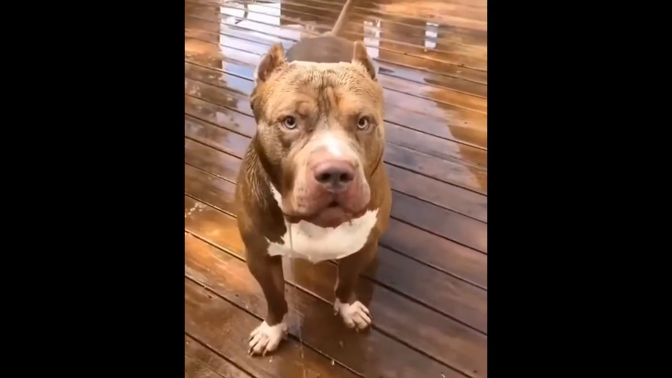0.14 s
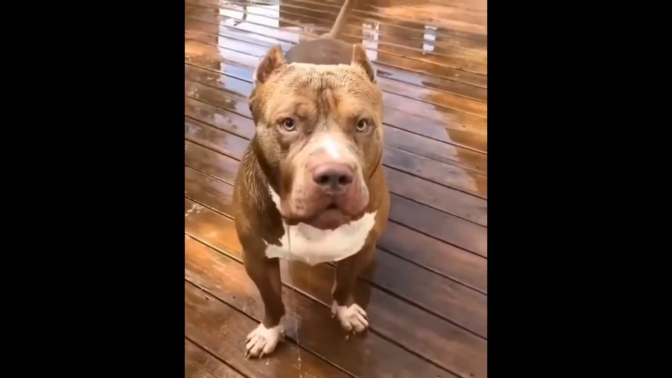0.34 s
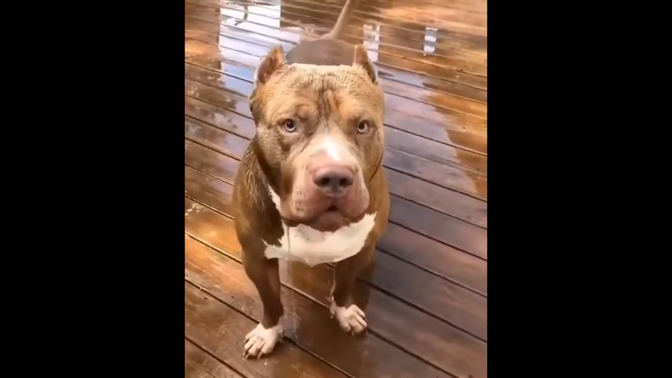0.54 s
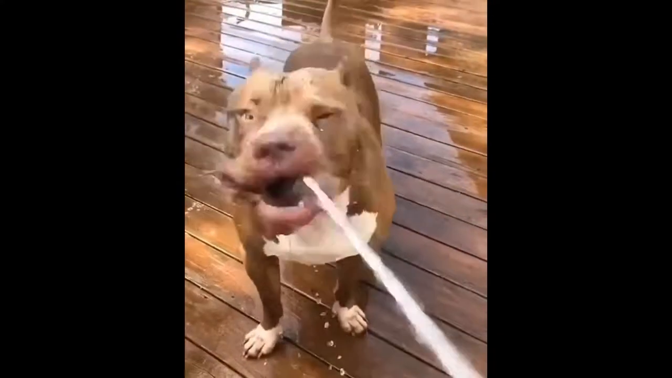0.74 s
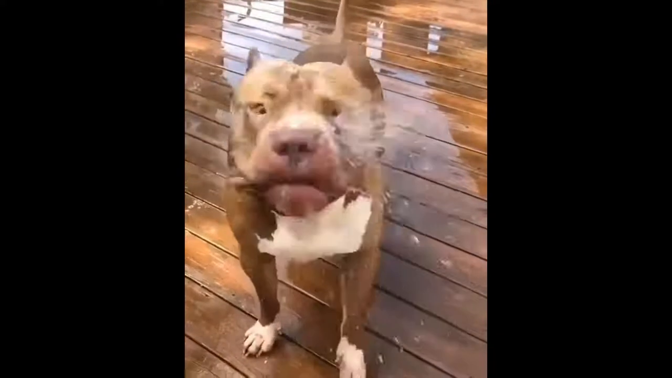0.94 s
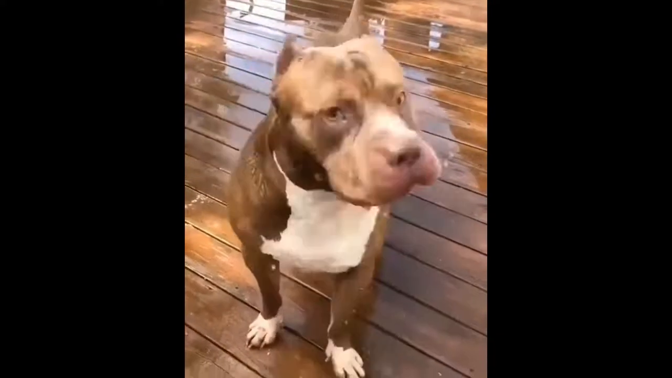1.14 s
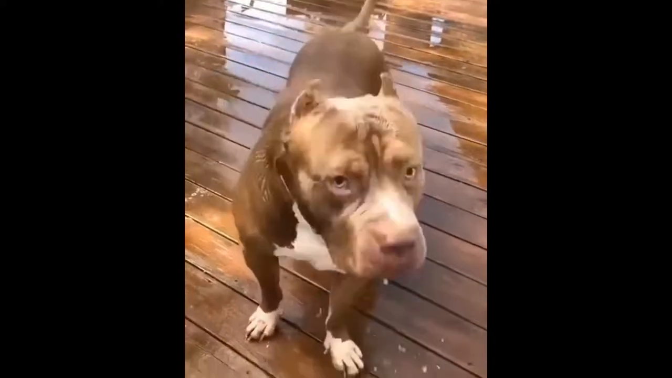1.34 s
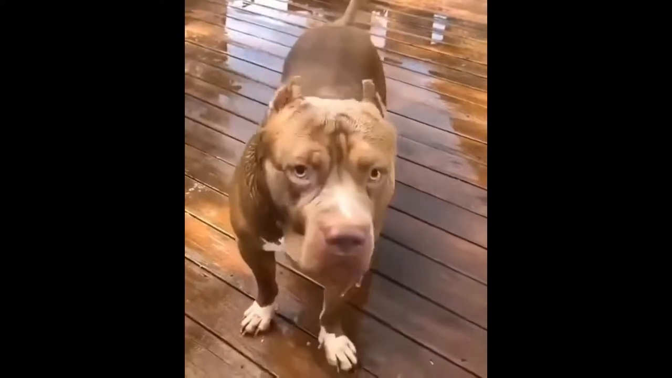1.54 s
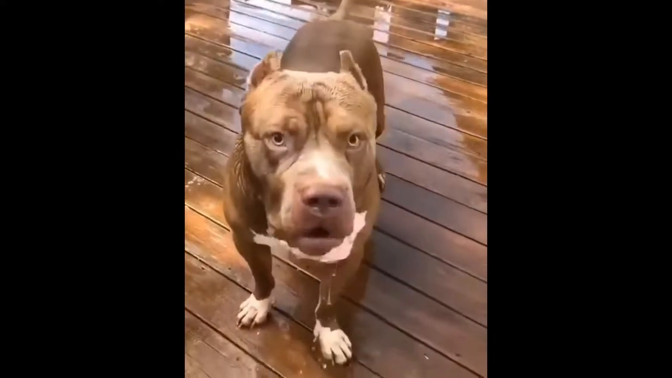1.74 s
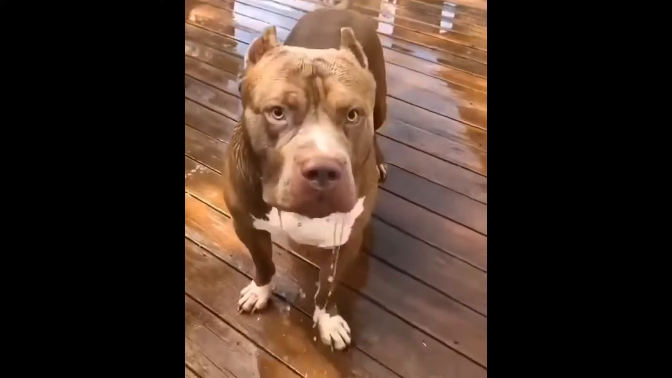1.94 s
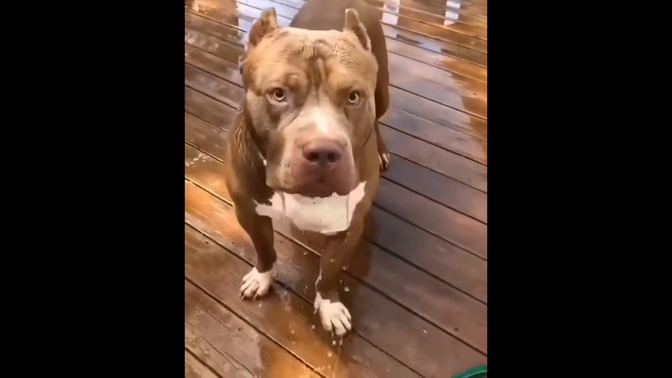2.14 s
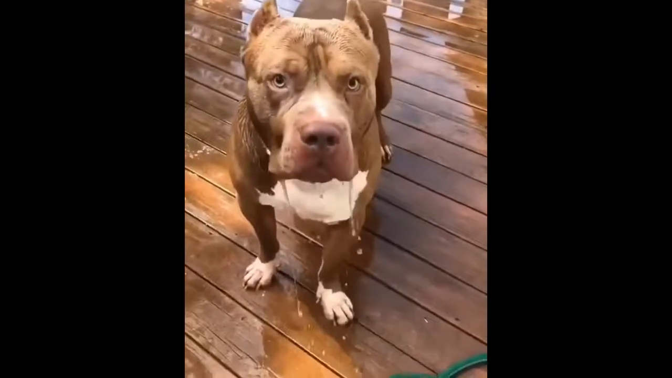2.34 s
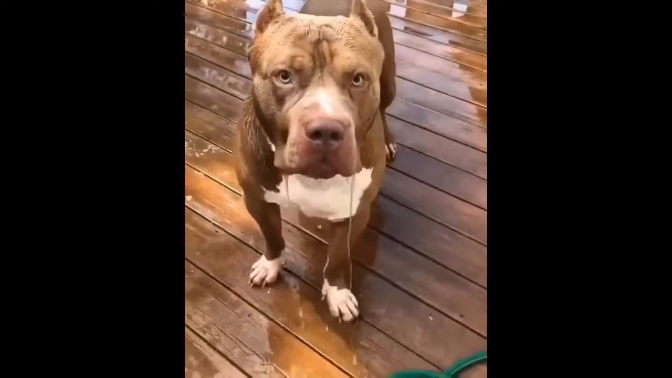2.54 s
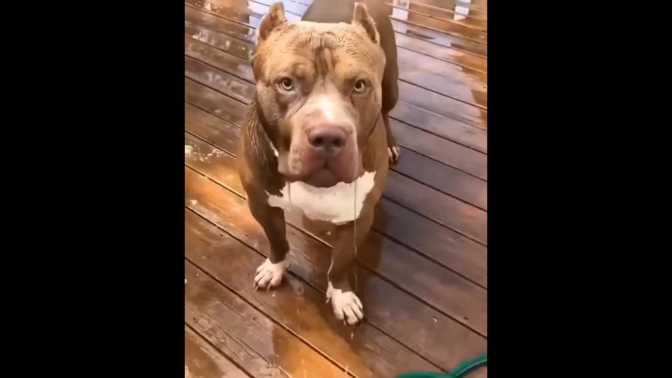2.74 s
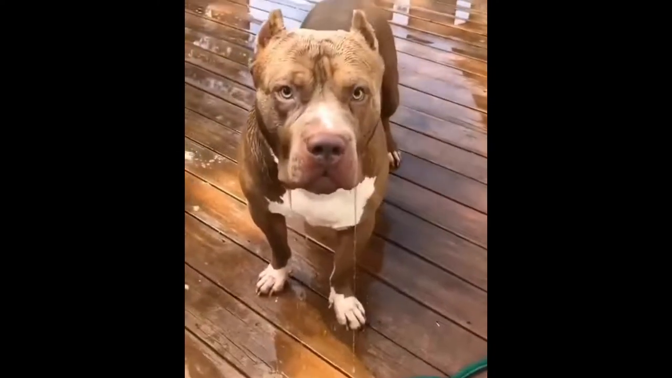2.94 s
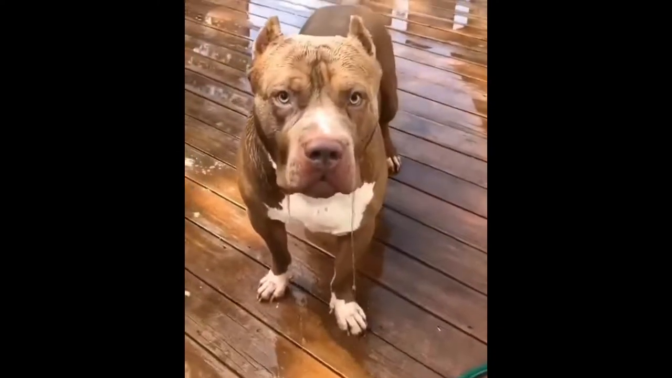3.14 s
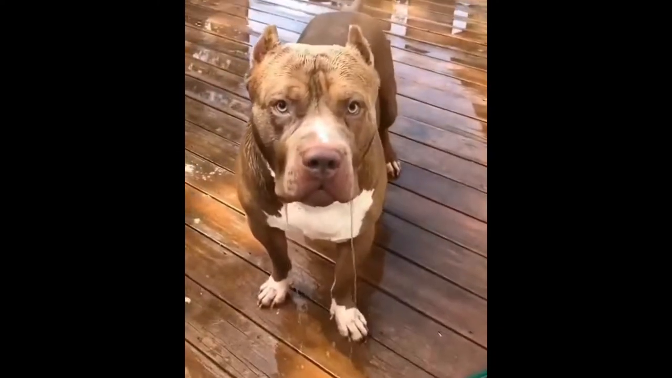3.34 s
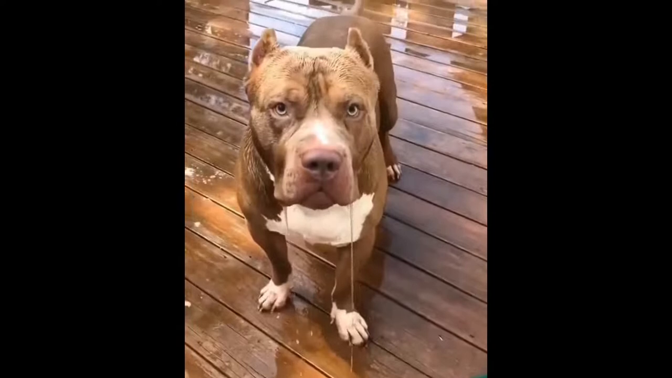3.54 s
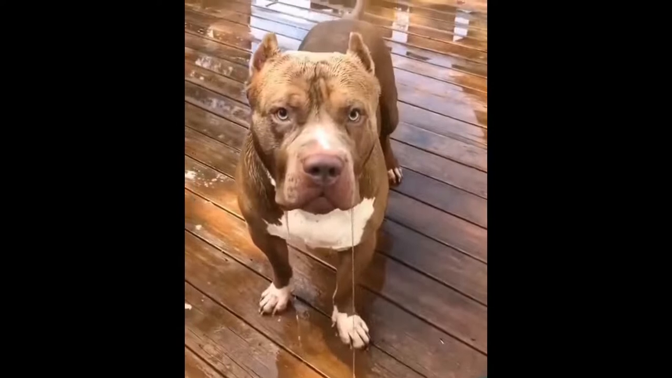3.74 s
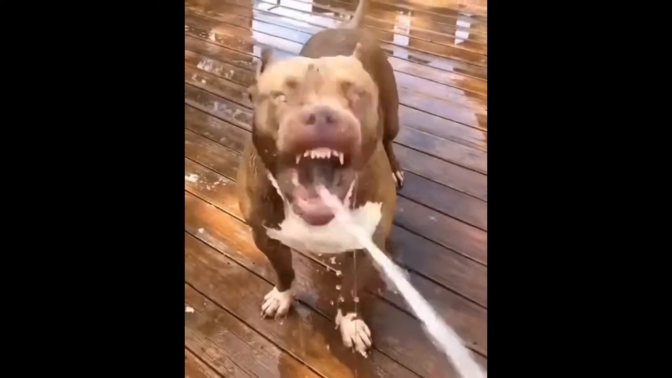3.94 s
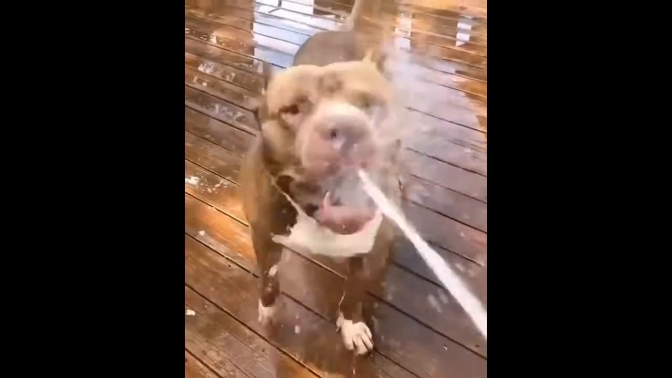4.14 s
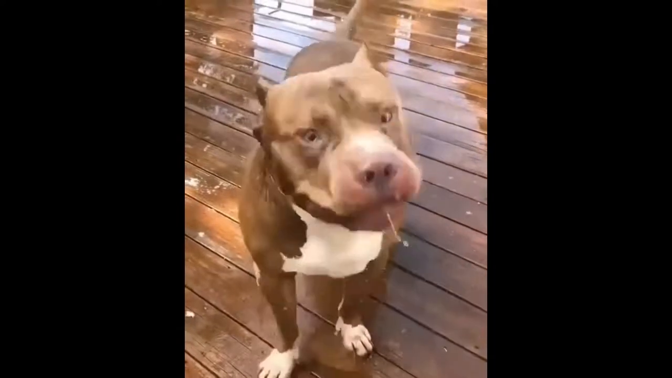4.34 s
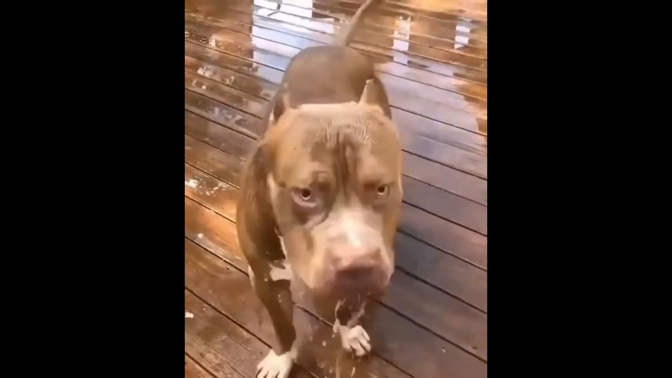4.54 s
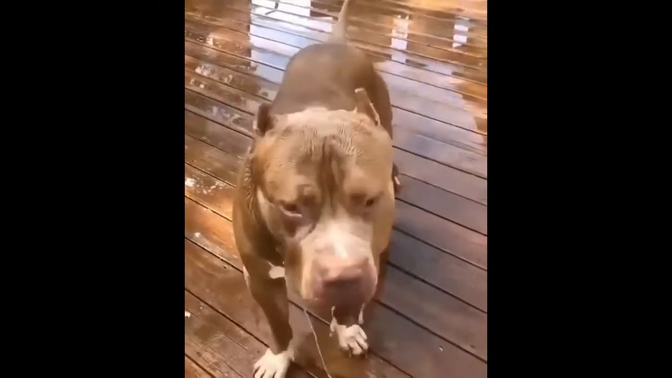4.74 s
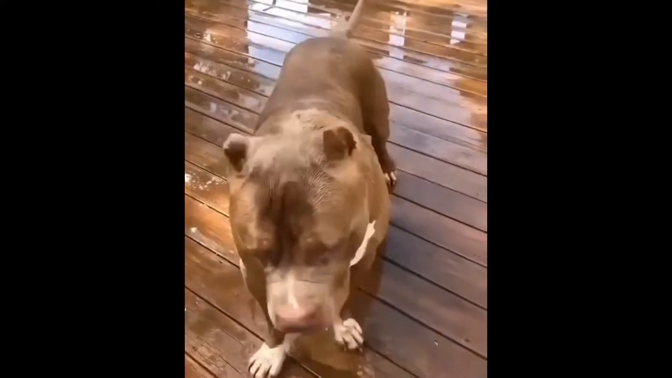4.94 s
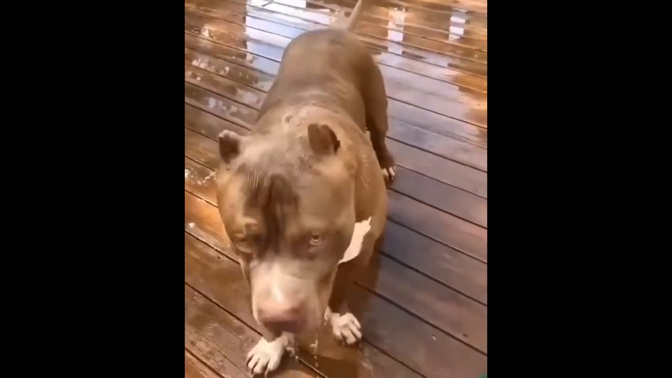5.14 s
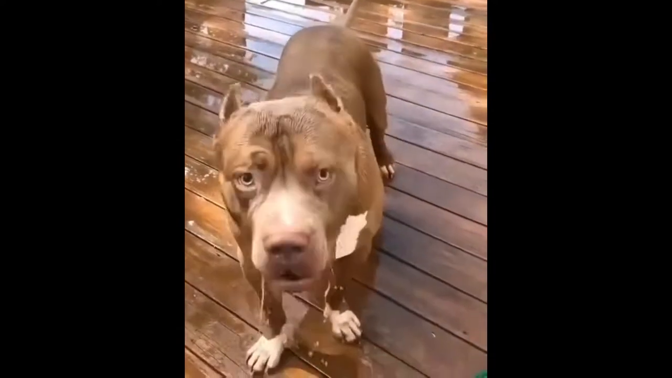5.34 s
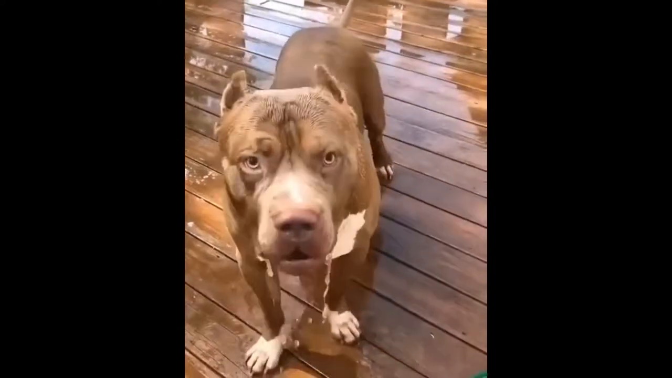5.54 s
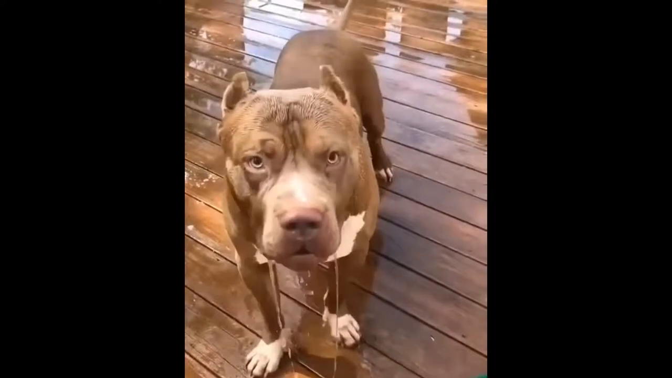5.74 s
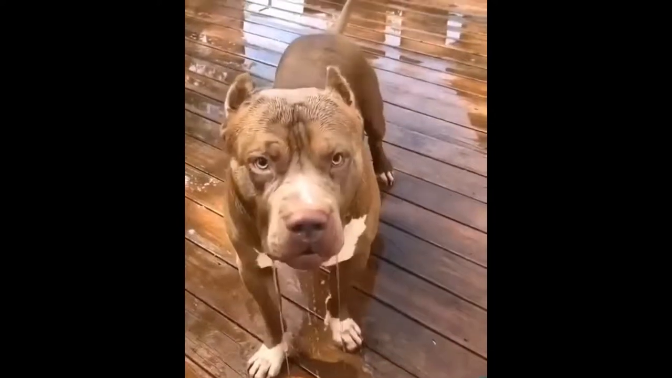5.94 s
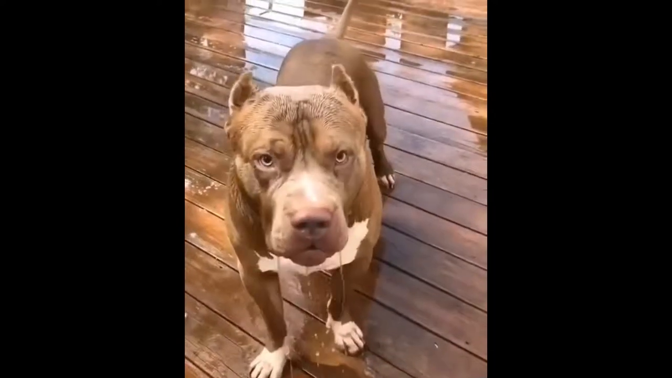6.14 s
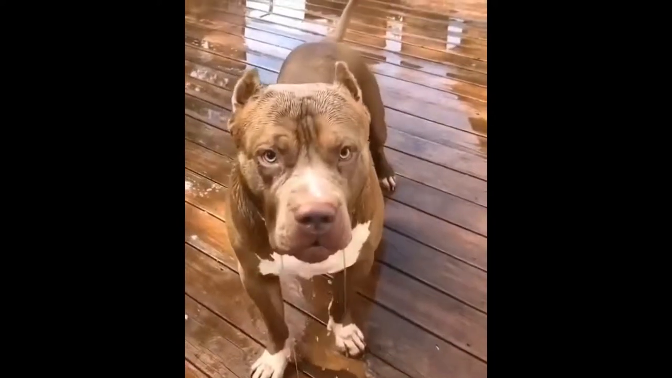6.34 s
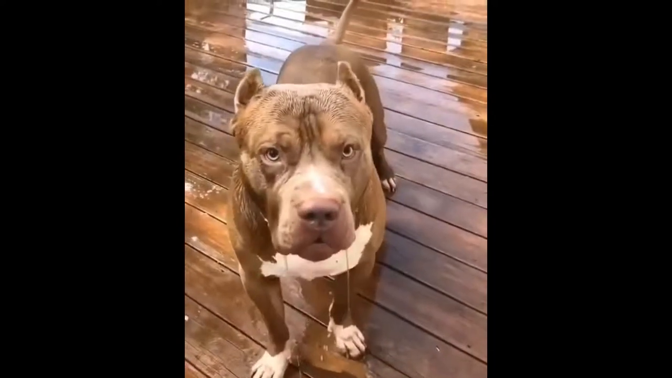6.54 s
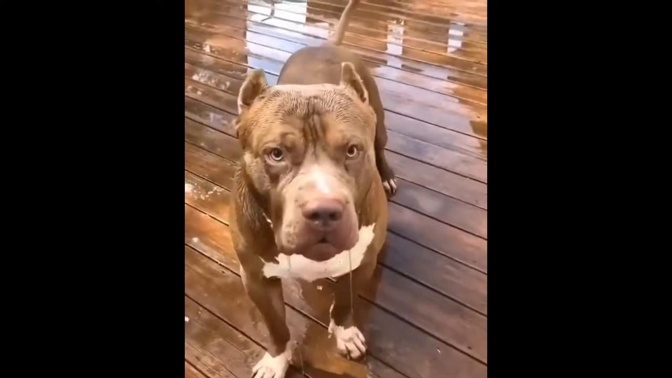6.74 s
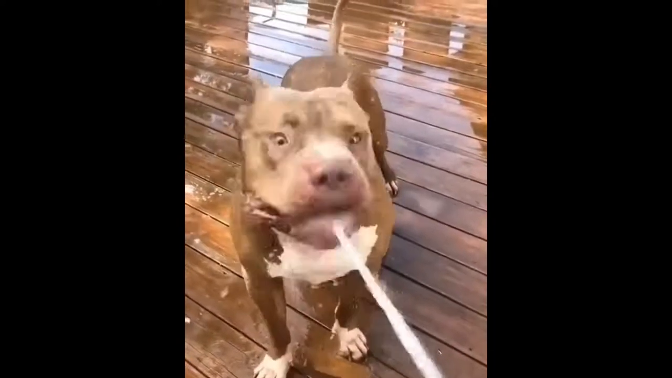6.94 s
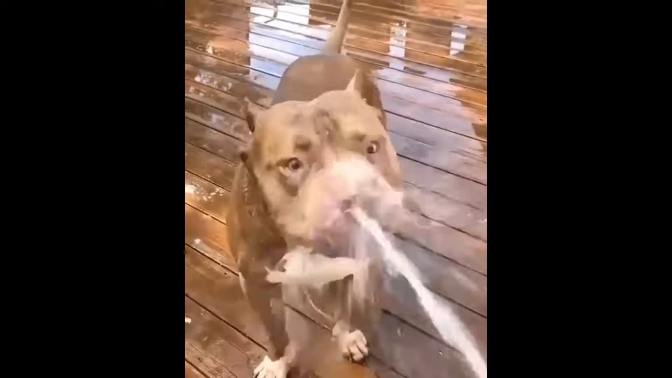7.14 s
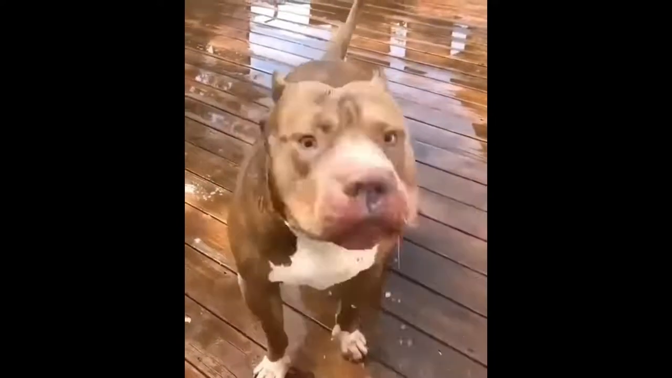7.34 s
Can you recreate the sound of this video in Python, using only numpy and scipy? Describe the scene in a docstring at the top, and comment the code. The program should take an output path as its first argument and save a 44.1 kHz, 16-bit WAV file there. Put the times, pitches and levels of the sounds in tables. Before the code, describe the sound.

Three short bursts of water, around one, four and seven seconds, strike a dog's muzzle with crisp spray and wet gurgling. After the first two the loose jowls slosh, slap and gulp; the last is cut off while still splashing. Quieter gaps hold sharp lip smacks, drips and a faint trickle through deck boards. The microphone is close, nearly dry, with a constant faint motor hum and whine and airy outdoor hiss behind.

```python
"""A motor hums and whines steadily behind a yard's rumble and hiss: two wavering tones and coloured noise.
A big dog on a wet wooden deck smacks its lips (snaps of noise), then bites at three hose squirts.
Each squirt spatters on its muzzle and churns in the open mouth: crowds of ringing droplets and bubbles.
It is gulped with slapping jowls, as sliding notes with noisy slaps; in between, lips smack and drool drips.
After the first squirt, water trickles off the boards as scattered bubbles."""
import sys
import numpy as np
from scipy import signal
from scipy.fft import rfft, irfft
from scipy.io import wavfile
from scipy.ndimage import uniform_filter1d

SR = 44100
rng = np.random.default_rng(int(sys.argv[2]) if len(sys.argv) > 2 else 0)


def digitize_waveform(pressure):
    """Quantize a signal to 16-bit integers and store it at the path in sys.argv[1].

    Rows of a 2-D input are taken as channels; values are limited to [-1, 1].
    """
    field = np.atleast_2d(pressure).T
    bounded = np.clip(field, -1, 1)
    quanta = np.round(bounded * 32767).astype(np.int16)
    wavfile.write(sys.argv[1], SR, quanta)


N = 326781
TIME = np.arange(N) / SR   # seconds

# Colour of the distant rumble: f/Hz, relative level/dB
YARD_COLOUR = [(25, -31), (70, -7.5), (100, -2.5), (146, -4), (224, -3), (320, -5.5), (400, -23), (560, -8)]
# Colour of the outdoor hiss: f/Hz, relative level/dB
HISS_COLOUR = [(400, 23), (700, 9.5), (1000, 5), (1500, -1), (2500, -2), (4000, -1.5), (6500, -1),
               (9000, -5), (14000, -5)]
# Course of the hiss, before a fixed lift: t/s, level/dB
HISS_COURSE = [(0, -63), (1, -60), (2.6, -60), (4, -58.5), (5.5, -57), (7.4, -59)]
# Hum and whine of the motor: f/Hz, rms level/dB, level waver/dB, pitch wander/Hz
MOTOR_TONES = [(102.2, -55.5, 2.2, 1.1), (592.3, -45.5, 0.35, 0.6)]
# Colour of run-off trickling between the boards: f/Hz, relative level/dB
TRICKLE_COLOUR = [(1100, -24.5), (3000, 4), (7000, 2.5)]
# Single drops that trap a bubble: t/s, level/dB, starting f/Hz
BUBBLE_DROPS = [(2.021, -44.5, 1240), (2.552, -43.5, 3100), (4.201, -25.5, 3410), (4.998, -44.5, 1380),
                (5.421, -41, 1360), (6.176, -31.5, 4540), (7.223, -12, 3865)]
# Loose wet lips and run-off pattering on the boards: middle t/s, half length/s, level/dB, f/Hz
WET_CRACKLES = [(1.398, 0.0099, -41.5, 5970), (1.48, 0.0044, -40.5, 2330), (1.524, 0.0037, -43.5, 2060),
                (1.897, 0.026, -48.5, 1760), (4.895, 0.019, -51.5, 1800), (5.005, 0.026, -41, 7500),
                (5.085, 0.019, -46.5, 7400), (5.245, .012, -51, 2760), (5.306, 0.016, -49.5, 5250)]
# Lip smacks and big drops: t/s, peak level before a small trim/dB, f/Hz
LIP_SMACKS = [(0.418, -34, 11800), (0.9452, -23.5, 12700), (0.952, -24.5, 7100), (1.3913, -24, 6200),
              (1.4762, -22.5, 5400), (1.5444, -20.5, 9600), (1.5925, -29, 9300), (1.7696, -22.5, 4670),
              (1.7932, -26, 8720), (2.152, -35, 10100), (2.4618, -38.5, 4580), (2.4857, -22, 6700),
              (2.8414, -33.5, 10800), (2.886, -35, 2630), (2.975, -35.5, 11900), (3.0335, -28.5, 5500),
              (3.1438, -35, 10400), (3.5643, -32, 12600), (4.029, -31.5, 11800), (4.8764, -23.5, 13000),
              (4.9453, -21.5, 10200), (5.3383, -26, 11000), (5.5273, -27.5, 7400), (5.8311, -38.5, 9410),
              (6.3505, -23.5, 12400), (6.6613, -37.5, 11300), (6.9401, -37.5, 5470), (7.1062, -20.5, 5800)]
# Biggest air pockets popping in cheeks and jowls: t/s, peak level of the note/dB, f/Hz, time to fall 60 dB/s
BIG_POCKETS = [(1.037, -30, 609, 0.046), (1.111, -20, 1012, 0.03), (1.167, -28.5, 805, 0.2),
               (1.193, -30, 620, 0.12), (1.312, -31.5, 604, 0.072), (1.476, -31.5, 810, 0.0075),
               (1.521, -33.5, 810, 0.032), (1.579, -34.5, 408, 0.005), (1.884, -32, 1900, 0.0071),
               (1.889, -31, 332, 0.064), (4.278, -31, 503, 0.061), (4.314, -23.5, 1140, 0.057),
               (4.437, -22.5, 920, .016), (4.459, -28, 640, 0.017), (4.468, -30, 330, 0.053),
               (4.521, -27.5, 516, 0.015), (4.622, -22.5, 844, 0.027), (4.637, -28.5, 300, 0.044),
               (4.705, -14, 835, 0.045), (4.708, -17, 286, 0.013), (4.739, -17, 1490, 0.078),
               (4.754, -17.5, 630, 0.037), (4.774, -22.5, 354, 0.11), (4.826, -30, 397, 0.015),
               (4.945, -32, 192, 0.035), (7.301, -21.5, 520, 0.011)]
# Colours of fine spray, coarser splash and deep gurgle: f/Hz, relative level/dB
SPRAY_COLOUR = [(3000, -52), (4200, -6), (5500, 2), (7500, -2.5), (10000, 0), (14000, -2)]
SPLASH_COLOUR = [(1400, -27), (2000, 2.5), (2700, 4), (4000, 6.5), (5000, -13.5), (7000, 5)]
GURGLE_COLOUR = [(90, -9.5), (280, -3.5), (550, -13), (850, -8), (1300, -11), (1800, 1.5), (2400, -25.5)]
# Lowest resonance of the mouth as the jaws open and close, one curve per squirt: t/s, f/Hz
MOUTH_CURVES = [
    [(1.03, 590), (1.098, 1090), (1.214, 635), (1.24, 1024), (1.298, 906), (1.33, 616)],
    [(4.27, 546), (4.312, 1210), (4.508, 662), (4.55, 930), (4.772, 935), (4.8, 420)],
    [(7.2, 670), (7.222, 732), (7.248, 1470), (7.27, 1475), (7.328, 570), (7.4, 746)],
]
# Squirts from the hose, levels before the final mix: t/s, delay until it enters the mouth/s,
# time it plays there/s, spray/dB, splash/dB, gurgle/dB, time the mouth takes to fill/s
HOSE_SQUIRTS = [(1.014, .072, .1, -24, -25.5, -36.5, .025), (4.247, .059, .168, -22, -26.5, -39, 0.0208),
                (7.164, .058, .08, -20, -26.5, -32, .055)]
# Jowls squeezing water out, levels before the final mix: t/s, attack/s, hold/s, release/s,
# spray/dB, splash/dB, gurgle/dB
JOWL_SLOSHES = [(1.255, .17, .024, .18, -24, -25, -29), (1.356, 0.11, 0.011, .3, -43, -44, -43),
                (4.496, .1, .042, 0.074, -32, -38.5, -39), (4.549, .006, .042, .05, -25.5, -27, -36.5),
                (4.619, 0.071, 0.0122, 0.062, -36, -45, -43.5), (4.72, .17, 0.022, 0.21, -25.5, -25, -25.5),
                (7.345, .1, .02, .1, -34, -40, -45), (7.37, 0.012, 0.0314, 0.12, -24, -32, -38.5)]


def from_db(db):
    """Decibels to gain."""
    return 10 ** (np.asarray(db) / 20)


def rms_one(x):
    """Scale to unit power."""
    return x / np.sqrt(np.mean(x ** 2) + 1e-20)


def at_hz(points, hz):
    """Read a colour at any pitch, on a log-frequency axis."""
    freqs, levels = np.transpose(points)
    return np.interp(np.log(hz), np.log(freqs), levels)


def add(out, s, sound):
    """Mix a sound in at time s."""
    start = max(round(s * SR), 0)
    out[start:start + len(sound)] += sound[:N - start]


def drift(rate):
    """A smooth random wander with rms 1; a higher rate wanders faster."""
    # Made at every 20th sample, dropping the start-up, then joined by straight lines.
    r = np.exp(-40 * np.pi * rate / SR)
    push = rng.standard_normal(N // 20 + 2002)
    slow = signal.lfilter([1], [1, -2 * r, r * r], push)[2000:]
    return np.interp(np.arange(N) / 20, np.arange(len(slow)), rms_one(slow))


def resonance(x, hz, width_hz):
    """A hollow space favours one pitch: a two-pole band-pass with gain near 1 on top."""
    r = np.exp(-np.pi * width_hz / SR)
    feedback = [1, -2 * r * np.cos(2 * np.pi * hz / SR), r * r]
    return signal.lfilter(np.array([1, 0, -1]) * (1 - r * r) / 2, feedback, x + 1e-18)


def moving_resonance(x, hz, sharpness):
    """A band-pass whose centre follows a curve: shift down, smooth, shift back."""
    turn = np.exp(2j * np.pi * np.cumsum(hz) / SR)
    r = np.exp(-np.pi * np.mean(hz) / sharpness / SR)
    return 2 * np.real(turn * signal.lfilter([1 - r], [1, -r], x / turn))


def level_out(x):
    """Hold the power steady over about 15 ms."""
    return x / np.sqrt(np.maximum(uniform_filter1d(x ** 2, size=660), 1e-12))


def noise(colour):
    """Smooth noise of a given colour that dies away beyond its ends; rms 1."""
    hz = np.arange(1, N + 2) * SR / (2 * N)
    skirts = 1 / (1 + (hz / colour[-1][0]) ** 8) / (1 + (colour[0][0] / hz) ** 4)
    white = rfft(rng.standard_normal(2 * N))
    return rms_one(irfft(white * from_db(at_hz(colour, hz)) * skirts)[:N])


def impacts(size, per_s, spread_db):
    """Droplets land at random as single clicks, most small and a few large."""
    born = rng.random(size) < per_s / SR
    loudness_db = spread_db * np.minimum(rng.exponential(1, size), 4)
    return born * rng.choice([-1, 1], size) * from_db(loudness_db)


def droplets(colour, per_s, spread_db, sharpness, patchy_db, count):
    """Droplets of many sizes ring briefly; patchy_db sets how far each size's level wanders; rms 1."""
    out = np.zeros(N)
    hits, dealt = impacts(N, per_s, spread_db), rng.integers(0, count, N)
    for k, hz in enumerate(np.geomspace(colour[0][0], colour[-1][0], count)):
        rings = resonance(hits * (dealt == k), hz, hz / sharpness)
        rings = rms_one(resonance(rings, hz, hz))
        out += rings * np.sqrt(hz) * from_db(at_hz(colour, hz) + patchy_db * drift(11.0))
    return rms_one(out)


def bubbles(colour, per_s, cycles, spread_db):
    """Tiny bubbles, each with its own pitch, fall 60 dB in a number of cycles; rms 1."""
    born, pitch, size = rng.random((int(per_s * N / SR), 3)).T
    hz = colour[0][0] * (colour[-1][0] / colour[0][0]) ** pitch
    gain = hz * from_db(at_hz(colour, hz) + spread_db * np.minimum(-np.log(1 - size), 4))
    steps = np.arange(SR // 80)
    turns = np.outer(hz, steps / SR).astype(np.float32)
    rings = gain[:, None] * np.exp(-np.log(1000) * turns / cycles) * np.sin(2 * np.pi * turns)
    at = (born * N).astype(int)[:, None] + steps
    return rms_one(np.bincount(at.ravel(), rings.ravel(), N)[:N])


def envelope(s, attack_s, hold_s, release_s, sag_db=0):
    """A gain that is full at time s, sags while it holds and dies away; attack and release span 60 dB."""
    corners = s + np.array([-attack_s, 0, hold_s, hold_s + release_s])
    levels_db = [-60, 0, -sag_db, -sag_db - 60]
    return from_db(np.interp(TIME, corners, levels_db, left=-np.inf, right=-np.inf))


def yard():
    """Distant rumble and a faint, slightly restless hiss, both coloured noise."""
    hiss_db = np.interp(TIME, *np.transpose(HISS_COURSE)) + 1.1 * drift(4)
    return from_db(-50.73) * noise(YARD_COLOUR) + from_db(hiss_db + 3.0) * noise(HISS_COLOUR)


def motor():
    """A low hum and a steady whine are pure tones, both wavering slightly."""
    out = np.zeros(N)
    for hz, level_db, waver_db, wander_hz in MOTOR_TONES:
        phase = 2 * np.pi * np.cumsum(hz + wander_hz * drift(3.4)) / SR
        out += np.sqrt(2) * from_db(level_db + waver_db * drift(31)) * np.sin(phase)
    return out


def deck_echo(x, t60, delay_s):
    """Boards and house wall scatter a short tail: fading noise that starts after delay_s."""
    t = TIME[:SR // 2]
    tail = resonance(rng.standard_normal(len(t)), 2100, 6600)
    tail = tail * from_db(-60 * t / t60) * (t > delay_s)
    return signal.fftconvolve(x, tail / np.sqrt(np.sum(tail ** 2)))[:N]


def trickle():
    """From the first squirt on, water runs off the boards in faint, scattered bubbles."""
    running = TIME > HOSE_SQUIRTS[0][0]
    return from_db(-71) * running * bubbles(TRICKLE_COLOUR, per_s=41, cycles=19, spread_db=2.0)


def drool():
    """Faint drops keep falling from the chin, each a short splat of noise."""
    t = TIME[:SR // 25]
    splat = rng.standard_normal(len(t)) * t * np.exp(-t / 0.00097)
    falls = impacts(N, per_s=10, spread_db=2.4) * from_db(-49)
    return resonance(signal.fftconvolve(falls, splat / np.abs(splat).max())[:N], 8100, 8000)


def plinks(cycles, rough, flutter_hz):
    """A bubble's note wobbles and rises a little as it nears the surface."""
    rise_per_s = 7   # share of the starting pitch
    out, t = np.zeros(N), TIME[:SR // 20]
    for s, level_db, hz in BUBBLE_DROPS:
        shape = (1 - np.exp(-t / 0.00013)) * from_db(-60 * t * hz / cycles)
        flutter = rms_one(resonance(rng.standard_normal(len(t)), flutter_hz, 2 * flutter_hz))
        pitch = hz * (1 + rise_per_s * t + rough * flutter)
        add(out, s, from_db(level_db) * shape * np.sin(2 * np.pi * np.cumsum(pitch) / SR))
    return out


def slurps(width):
    """Loose wet lips and run-off give brief swells of crackle; width is a share of the pitch."""
    out, middle_s = np.zeros(N), 1 / 4
    for s, half_s, level_db, hz in WET_CRACKLES:
        crackle = rms_one(resonance(impacts(SR // 2, per_s=1800, spread_db=3.0), hz, hz * width))
        swell = np.exp(-((TIME[:SR // 2] - middle_s) / half_s) ** 2 / 2)
        add(out, s - middle_s, from_db(level_db) * crackle * swell)
    return out


def spatter():
    """Each smack throws fine drops that patter down after it."""
    gain, t = np.zeros(N), TIME[:SR // 2]
    below_smack_db, t60 = -29.5, 0.43   # t60: seconds to fall 60 dB
    for s, level_db, _ in LIP_SMACKS:
        add(gain, s, from_db(level_db + below_smack_db - 60 * t / t60))
    return gain * rms_one(resonance(impacts(N, per_s=1500, spread_db=5.0), 6500, 12000))


def smacks(swell_s, snap_cycles, after_db, sharpness, bright_db):
    """Each smack is a short snap of noise after a very brief swell, the higher the quicker, then a crackle."""
    lead_s, after_t60 = 0.01, 0.045
    out, t = np.zeros(N), TIME[:SR // 12] - lead_s
    after, swell = np.maximum(t, 0), np.exp(np.minimum(t, 0) / swell_s)
    for s, level_db, hz in LIP_SMACKS:
        snap = rng.standard_normal(len(t)) * from_db(-60 * after * hz / snap_cycles)
        snap += from_db(after_db - 60 * after / after_t60) * impacts(len(t), per_s=5400, spread_db=5.5)
        pocket = resonance(resonance(snap * swell, hz, hz / sharpness), hz, hz)
        sound = pocket + from_db(bright_db) * resonance(snap * swell, 8000, 12000)
        add(out, s - lead_s + swell_s, from_db(level_db) * sound / np.abs(sound).max())
    return out


def small_pockets(gurgle_gain, mouth_hz, count):
    """Small gulps come by chance, more and louder as the mouth churns harder: rows like BIG_POCKETS."""
    above_gurgle_db, scatter_octaves, t60 = 2.5, 0.552, 0.031
    when = (np.arange(count) + rng.random(count)) / count
    at = np.searchsorted(np.cumsum(gurgle_gain) / gurgle_gain.sum(), when)
    pitches = mouth_hz[at] * 2 ** (scatter_octaves * rng.standard_normal(count))
    levels_db = 20 * np.log10(gurgle_gain[at]) + above_gurgle_db
    return [(i / SR, level_db, hz, t60) for i, level_db, hz in zip(at, levels_db, pitches)]


def gulps(pockets, swell_s, glide, rough, flutter_hz, slap_db, slap_t60):
    """Flesh slaps shut on an air pocket, which rings; its soft walls make the pitch slide and flutter."""
    out, t = np.zeros(N), TIME[:SR // 5]
    for s, level_db, hz, t60 in pockets:
        wobble, slap = rng.standard_normal((2, len(t)))
        flutter = rms_one(resonance(wobble, flutter_hz, 2 * flutter_hz))
        pitch = hz * (1 + glide * (np.minimum(t / t60, 1) - 0.2) + rough * flutter)
        swell = 1 - np.exp(-(t / swell_s) ** 2)
        shape = swell * from_db(-60 * t / t60)
        ring = shape / shape.max() * np.sin(2 * np.pi * np.cumsum(pitch) / SR)
        slap = rms_one(resonance(slap, hz, 0.35 * hz)) * swell * from_db(slap_db - 60 * t / slap_t60)
        add(out, s, from_db(level_db) * (ring + slap))
    return out


def water_gains():
    """Strength of spray, splash and gurgle: stray drops, jet head, stream and sloshes add mostly in power."""
    stray_lead_s, stray_db = 0.067, -51
    head_attack_s, head_s, head_release_s = 0.0059, 0.032, 0.111
    head_db = (-25, -41.5, -47)   # spray, splash, gurgle
    attack_s, spray_release_s, churn_release_s = 0.069, 0.28, 0.16   # splash and gurgle stop sooner
    spray_sag_db, splash_sag_db = 3, 6.5   # the stream loses pressure
    empty_mouth_db = -16   # change in the gurgle before the mouth has filled
    parts = []
    for s, delay_s, length_s, spray_db, splash_db, gurgle_db, fill_s in HOSE_SQUIRTS:
        entry_s = s + delay_s
        stray = from_db(stray_db) * envelope(s - stray_lead_s, attack_s, stray_lead_s, head_release_s)
        spray = from_db(spray_db) * envelope(entry_s, attack_s, length_s, spray_release_s, spray_sag_db)
        splash = from_db(splash_db) * envelope(entry_s, attack_s, length_s, churn_release_s, splash_sag_db)
        empty_db = empty_mouth_db * np.clip(1 - (TIME - entry_s) / fill_s, 0, 1)
        gurgle = from_db(gurgle_db + empty_db) * envelope(entry_s, attack_s, length_s, churn_release_s)
        parts.append([stray + spray, splash, gurgle])
        # The head of the jet hits the muzzle first.
        parts.append(np.outer(from_db(head_db), envelope(s, head_attack_s, head_s, head_release_s)))
    for s, slosh_attack_s, hold_s, release_s, *levels_db in JOWL_SLOSHES:
        parts.append(np.outer(from_db(levels_db), envelope(s, slosh_attack_s, hold_s, release_s)))
    return np.sqrt(sum(np.square(part) for part in parts))


def muzzle_echo(x, delay_s, sway, share):
    """Sound bounces between the moving jaws, which combs the spectrum with sliding notches."""
    return x + share * np.interp(TIME - delay_s * (1 + sway * drift(3.02)), TIME, x)


def jet(spray_gain, splash_gain, gurgle_gain, mouth_hz):
    """The jet breaks into fine spray, coarser splashes and big bubbles inside the mouth."""
    spray = droplets(SPRAY_COLOUR, per_s=11000, spread_db=0.5, sharpness=3.1, patchy_db=0.0, count=10)
    spray += from_db(-3.5) * bubbles(SPRAY_COLOUR, per_s=700, cycles=130, spread_db=3.5)
    splash = droplets(SPLASH_COLOUR, per_s=8000, spread_db=1.5, sharpness=5.2, patchy_db=2.2, count=16)
    splash += from_db(-1.5) * bubbles(SPLASH_COLOUR, per_s=450, cycles=50, spread_db=4.5)
    gurgle = droplets(GURGLE_COLOUR, per_s=3500, spread_db=2.5, sharpness=5.9, patchy_db=3.0, count=26)
    # The mouth cavity rings along with the gurgle.
    cavity = moving_resonance(gurgle, mouth_hz, sharpness=1.95)
    gurgle += rms_one(moving_resonance(cavity, mouth_hz, sharpness=0.82))
    spray = level_out(muzzle_echo(spray, delay_s=0.000923, sway=0.12, share=0.47))
    splash = level_out(muzzle_echo(splash, delay_s=0.000923, sway=0.12, share=0.47))
    water = from_db(-0.5) * spray * spray_gain
    water += from_db(-1.0) * splash * splash_gain
    water += from_db(0.2) * level_out(gurgle) * gurgle_gain
    return water * from_db(1.0 * drift(73))   # the stream arrives in small lumps


def scene():
    """Dog and water close by, yard and motor behind."""
    spray_gain, splash_gain, gurgle_gain = water_gains()
    mouth_hz = np.interp(TIME, *np.vstack(MOUTH_CURVES).T)
    pockets = list(BIG_POCKETS) + small_pockets(gurgle_gain, mouth_hz, count=14)
    dog = jet(spray_gain, splash_gain, gurgle_gain, mouth_hz)
    dog += gulps(pockets, swell_s=0.0024, glide=-0.063, rough=0.087, flutter_hz=177,
                 slap_db=-4.5, slap_t60=0.075)
    dog += from_db(-0.5) * smacks(swell_s=0.00098, snap_cycles=37, after_db=-9.5, sharpness=1.9, bright_db=0)
    dog += slurps(width=0.83) + spatter() + drool() + trickle()
    dog += plinks(cycles=83, rough=0.12, flutter_hz=350)
    echo = from_db(-20.0) * deck_echo(dog, t60=0.091, delay_s=0.0036)
    return (dog + echo + yard() + motor())[None]


def record(dry):
    """The treble is cut steeply above 14100 Hz."""
    return signal.sosfilt(signal.ellip(10, 0.3, 75, 14100, fs=SR, output="sos"), dry)


dry = scene()
out = record(dry)
digitize_waveform(out)
```